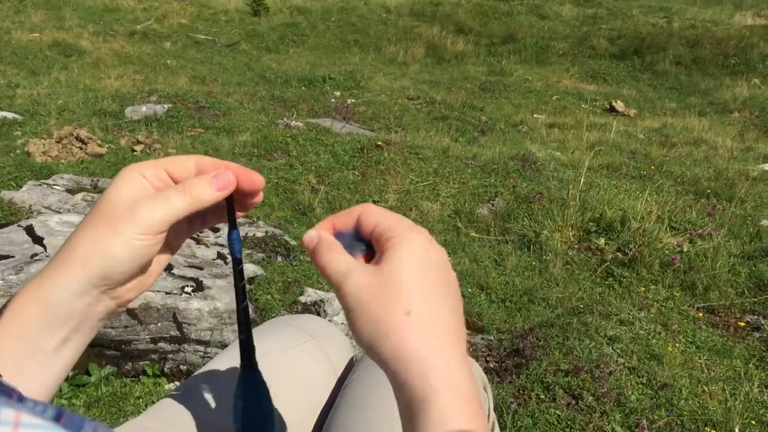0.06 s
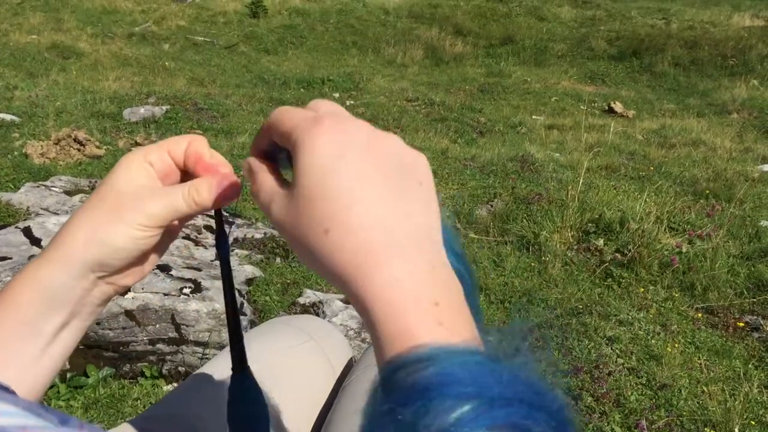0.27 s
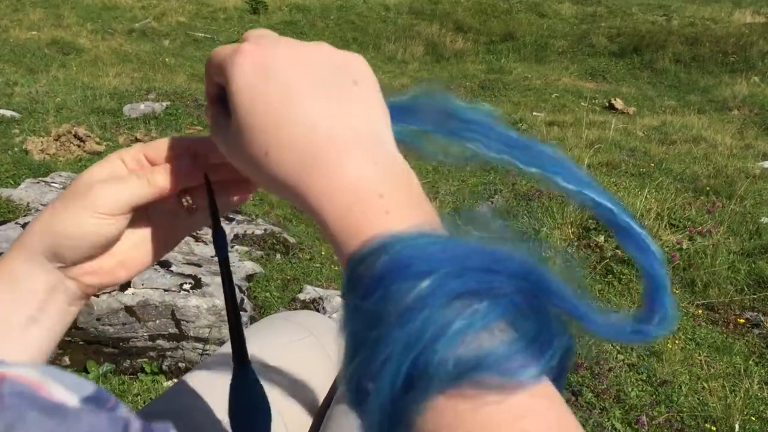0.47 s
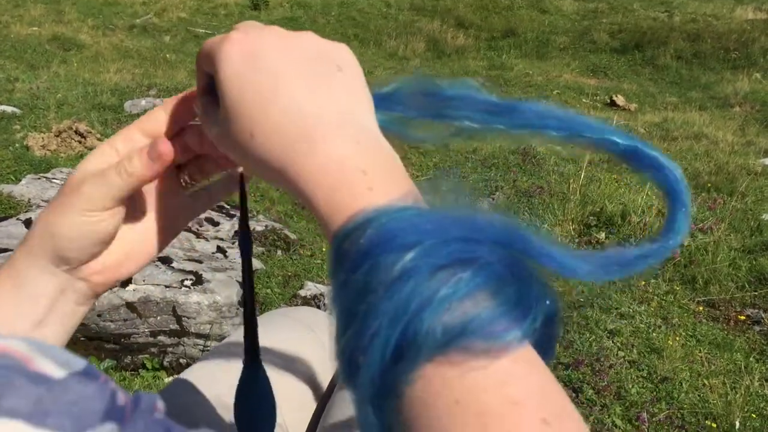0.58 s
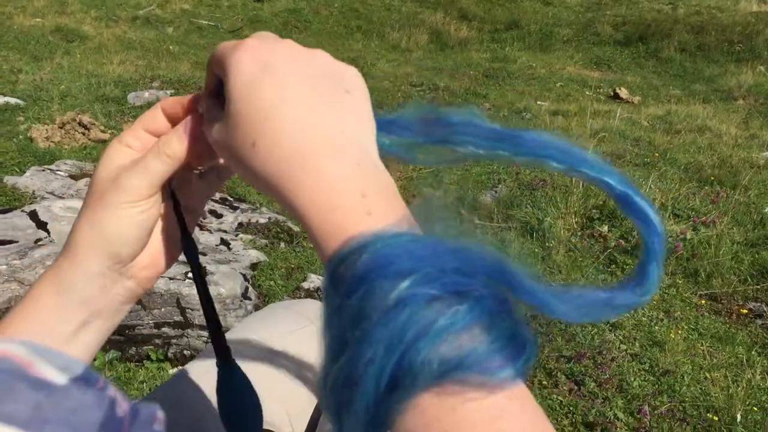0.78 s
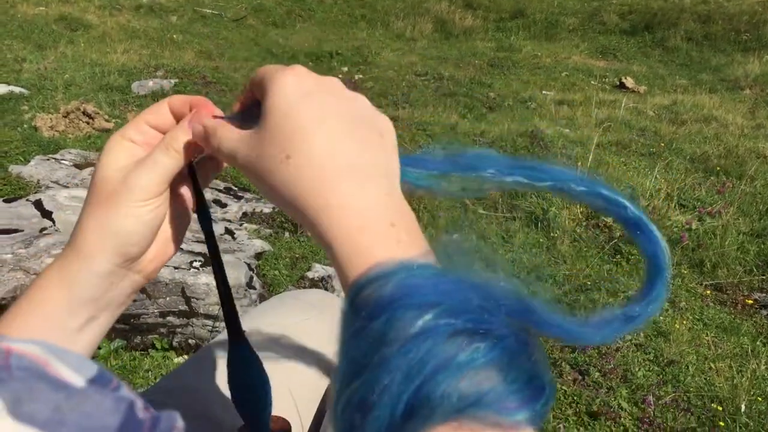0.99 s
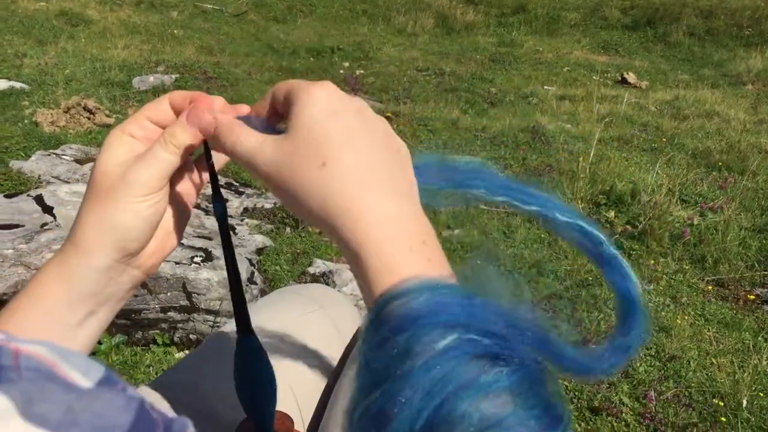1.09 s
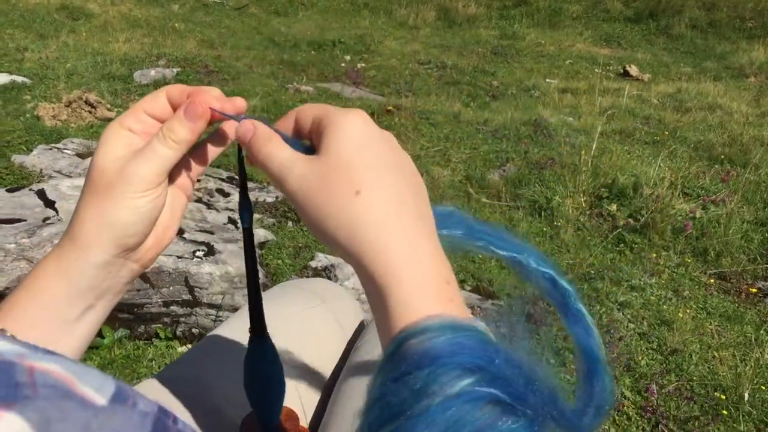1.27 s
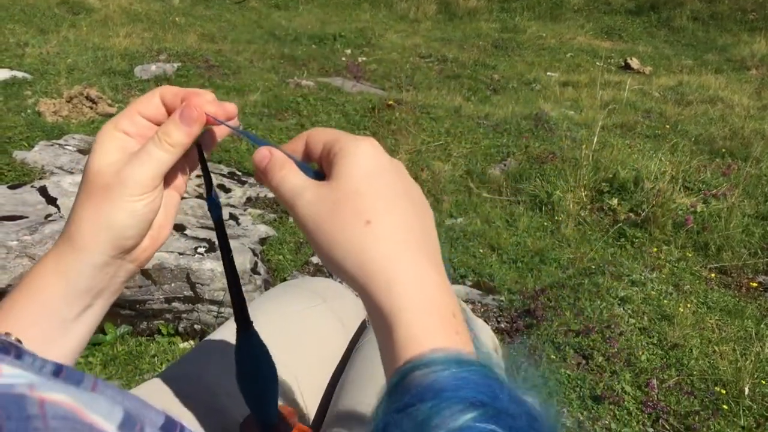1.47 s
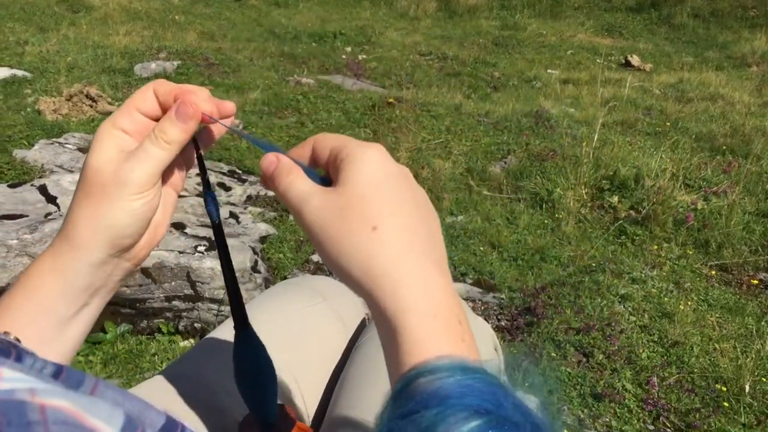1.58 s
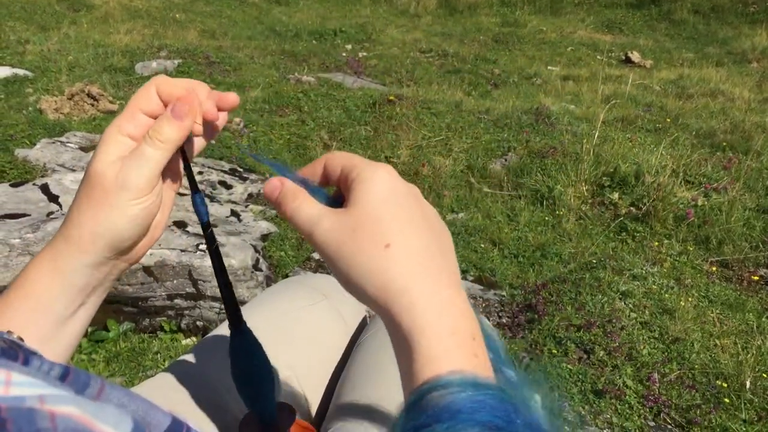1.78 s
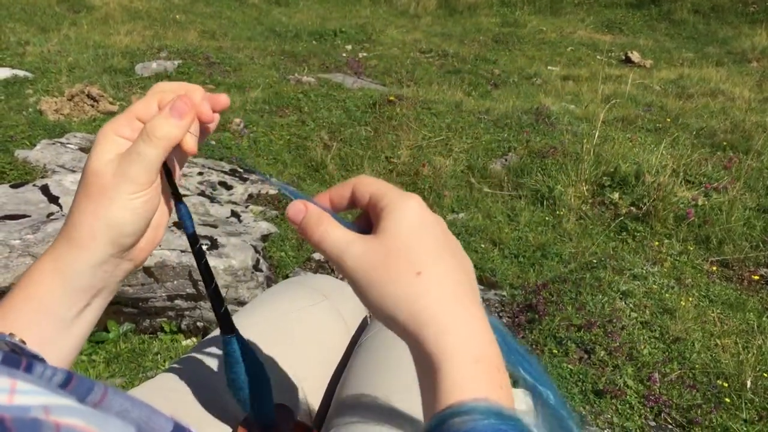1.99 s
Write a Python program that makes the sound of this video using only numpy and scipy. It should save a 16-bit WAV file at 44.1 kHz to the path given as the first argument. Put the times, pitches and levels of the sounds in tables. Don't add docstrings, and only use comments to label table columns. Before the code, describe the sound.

Light wind buffets a microphone in low uneven thumps, with one small wooden spindle knock

```python
import sys
import numpy as np
from scipy import signal
from scipy.fft import rfft, irfft
from scipy.io import wavfile

SR = 44100
rng = np.random.default_rng(int(sys.argv[2]) if len(sys.argv) > 2 else 0)


def digitize_waveform(pressure):
    field = np.atleast_2d(pressure).T
    bounded = np.clip(field, -1, 1)
    quanta = np.round(bounded * 32767).astype(np.int16)
    wavfile.write(sys.argv[1], SR, quanta)


def volts(x):
    e = np.asarray(x, float) / 20
    return 10 ** e


N = 90404

# centre_s [s], peak_db [dB], pitch_hz [Hz], length_s [s]
SLOW_EDDIES = [(0.01, -43.5, 88, 0.021), (0.067, -49.5, 77.5, 0.047), (0.169, -39, 80, 0.03),
               (0.361, -28.5, 79, 0.018), (0.442, -53.5, 66, 0.041), (0.527, -27, 63.8, 0.034),
               (0.706, -32.5, 75, 0.037), (0.78, -52.5, 68.4, 0.03), (0.877, -46, 72, 0.058),
               (0.928, -37, 75.7, 0.043), (0.972, -32.5, 62.8, 0.038), (1.059, -33, 75, 0.026),
               (1.163, -57.5, 65.5, 0.055), (1.206, -46, 54.3, 0.044), (1.277, -36.5, 83.6, 0.042),
               (1.492, -33, 87.5, 0.039), (1.619, -29.5, 68.4, 0.031), (1.808, -46, 88.5, 0.025),
               (1.862, -52.5, 86, 0.034), (1.941, -66, 60, 0.048), (2.023, -49.5, 86, 0.029)]
# centre_s [s], peak_db [dB], pitch_hz [Hz], length_s [s]
QUICK_EDDIES = [(0.1, -48.5, 96, 0.014), (0.211, -37.5, 151.3, 0.03), (0.273, -36, 111, 0.027),
                (0.617, -29.5, 142, 0.011), (0.658, -27, 125, 0.017), (0.773, -50.5, 174, 0.017),
                (0.834, -36.5, 105, 0.017), (0.933, -34.5, 183, 0.0118), (0.98, -34.5, 162, 0.015),
                (1.113, -36, 106, 0.026), (1.196, -46, 149, 0.025), (1.248, -32.5, 105, 0.013),
                (1.313, -44.5, 148, 0.023), (1.35, -37.5, 94.3, 0.04), (1.403, -34.5, 110.5, 0.025),
                (1.567, -22, 123.2, 0.019), (1.679, -31.5, 105.5, 0.016), (1.76, -21, 122, 0.0095),
                (1.928, -80, 264, 0.0092), (.39, -47, 100, .016), (1.756, -32, 65, .022),
                (.266, -46, 60, .022), (.616, -42, 70, .02), (1.745, -60, 400, .02)]
# centre_s [s], peak_db [dB], pitch_hz [Hz], length_s [s]
RIDING_EDDIES = [(.507, -39, 145, 0.013), (0.634, -37, 100, 0.022), (0.68, -43, 156, 0.034),
                 (.915, -34.5, 141, 0.014), (1.048, -40, 160, 0.0089), (1.255, -39, 191, 0.019),
                 (1.464, -34.5, 139, 0.021), (1.515, -39.5, 120, 0.031), (1.549, -28.5, 135, .015),
                 (1.725, -38.5, 206, 0.014), (1.741, -36, 150, 0.012), (1.748, -29, 80, 0.018),
                 (.355, -44.5, 159, 0.028), (.235, -48, 67, 0.019), (0.425, -53, 95, .025),
                 (0.598, -49, 66, 0.058), (1.0, -40.5, 103, 0.018), (1.569, -34.5, 52, 0.055),
                 (1.601, -51.5, 170, 0.015), (1.83, -48.5, 62, 0.044), (2.01, -55, 162, 0.016),
                 (1.49, -64, 317, 0.051), (.7, -40, 130, 0.0089), (1.556, -43, 262, 0.021),
                 (1.758, -47, 310, 0.014), (1.679, -47, 228, 0.017), (1.335, -49, 220, 0.019),
                 (.745, -48, 132, 0.023), (.548, -42, 143, .022), (1.795, -58, 140, 0.015),
                 (1.712, -37, 92, .02), (.726, -38, 160, .018), (.292, -47, 165, .016),
                 (1.13, -53, 175, .016), (.155, -58, 170, .016), (.2, -45, 75, .025),
                 (1.872, -68, 250, .02), (.72, -58, 270, .02), (1.645, -55, 70, .02)]
# time_s [s], level_db [dB]
GUST_STRENGTH = [(0, -64), (.19, -52), (.42, -56.5), (.53, -43), (.8, -56.5), (.95, -56.5), (1.13, -48),
                 (1.3, -53), (1.55, -45.5), (1.65, -59.5), (1.74, -42.5), (1.86, -65.5), (1.9, -81),
                 (2.05, -67)]
# pitch_hz [Hz], level_db [dB per Hz]
RUMBLE_COLOUR = [(15, -1), (25, -15), (42, 14), (59, 4.5), (140, 1), (247, -17), (328, -70), (420, -74.5),
                 (550, -59), (920, -120)]
# pitch_hz [Hz], level_db [dB per Hz]
HISS_COLOUR = [(180, -51), (300, 1.5), (759, -6.5), (1830, -8), (4860, -10.5), (6550, -9.5), (8970, -12.5),
               (10600, -12.5), (15800, -12.5)]
# start_s [s], peak_db [dB], contact_cut_hz [Hz], ring_share_db [dB], wood_pitch_ratio [ratio]
KNOCKS = [
    (.5775, -29, 3000, -19, 1.0),
    (.741, -60, 1200, -18, 1.1),
    (.831, -48, 750, -14, 1.1),
    (.837, -43, 950, -18, 1.05),
    (.8752, -45, 1150, -24, 1.03),
    (.882, -44, 650, -22, 1.03),
    (.606, -51, 1000, -8, 1.02),
    (.6, -53, 1800, -20, 1.0),
    (.92, -56, 900, -20, 1.0),
]
# pitch_hz [Hz], level_db [dB], t60_s [s]
CONTACT_MODES = [(498, -8, 0.019), (850, 0, .02), (1450, 1.5, 0.013), (2150, -4, 0.0065),
                 (3400, -16.5, 0.012), (5320, -8.5, 0.017)]
# pitch_hz [Hz], level_db [dB], t60_s [s]
WOOD_MODES = [(415, -2, .12), (856, -1, .3), (1010, -8, .06), (1312, 2, .2), (1650, -12, .05)]
# first_tick_s [s], period_s [s], level_db [dB], pitch_hz [Hz], width_hz [Hz]
GRASSHOPPERS = [
    (.0150, .05655, -68, 9300, 1800),
    (.0165, .0593, -69, 7600, 1800),
]
# time_s [s], first_db [dB], second_db [dB]
SINGING_EFFORT = [(0, 1, 0), (.15, 1, 0), (.3, -1, -2), (.45, -2, -2), (.6, -1, 0), (.75, -2, 1),
                  (.9, -2, 1), (1.05, -1, 1), (1.2, -2, -1), (1.35, -2, -3), (1.5, 1, 0), (1.65, 1, -1),
                  (1.8, 0, 0), (1.95, 0, 0), (2.05, 0, 1)]
# start_s [s], pitch_hz [Hz], level_db [dB], t60_s [s]
BELL_PARTIALS = [
    (.705, 2826, -74, 0.35),
    (.80, 4810, -75, 0.44),
    (.815, 4310, -72.5, 0.37),
    (.84, 1785, -76.5, 2.2),
    (1.41, 2830, -81, 0.31),
    (1.78, 1824, -85, 2),
]
# pitch_hz [Hz], width_hz [Hz], depth_db [dB]
PORT_DIPS = [(4950, 240, -2.5), (10650, 270, -4)]
# start_s [s], pitch_hz [Hz], peak_db [dB], rise_s [s]
PATS = [(.0, 550, -66, 0.0042), (0.832, 491, -64, 0.006), (0.841, 900, -60, 0.004), (.889, 880, -66, 0.005),
        (1.326, 540, -69, 0.0088), (1.635, 965, -62, 0.005), (1.635, 1417, -65, .004),
        (1.544, 368, -64, 0.013), (1.915, 550, -73, 0.01), (.831, 1350, -64, .004), (.915, 510, -70, .006),
        (1.924, 400, -73, .005), (1.984, 420, -75, .005), (2.034, 420, -73, .006), (.61, 415, -70, .008),
        (.829, 990, -64, .005), (.738, 890, -70, .004), (.607, 870, -62, .005), (.908, 910, -69, .005)]


def at_hz(points, hz):
    table_hz, table_db = np.array(points).T
    return np.interp(np.log(hz + 0.0009), np.log(table_hz), table_db)


def rms_one(x):
    return x / np.sqrt(np.mean(x ** 2) + 1e-20)


def coloured(spectrum, low_hz, high_hz):
    hz = np.fft.rfftfreq(N, 1 / SR)
    low_skirt = 1 / (1 + (low_hz / (hz + 1e-3)) ** 4)
    high_skirt = 1 / (1 + (hz / high_hz) ** 6)
    white = rfft(rng.standard_normal(N))
    return rms_one(irfft(white * volts(at_hz(spectrum, hz)) * low_skirt * high_skirt, N))


def drift(rate_hz):
    r = np.exp(-2 * np.pi * rate_hz / SR)
    return rms_one(signal.lfilter([1], [1, -2 * r, r * r], rng.standard_normal(N + SR))[SR:])


def ring(clicks, hz, t60):
    r = volts(-60 / (t60 * SR))
    w = 2 * np.pi * hz / SR
    return signal.lfilter([0, np.sin(w)], [1, -2 * r * np.cos(w), r * r], clicks + 1e-18)


def rumble():
    gust_s, gust_db = np.transpose(GUST_STRENGTH)
    lumps_db = 3.0 * drift(14.6)
    level_db = np.interp(np.arange(N) / SR, gust_s, gust_db) + lumps_db
    return volts(level_db) * coloured(RUMBLE_COLOUR, 32, 300)


def hiss():
    return volts(-70 + 0.89 * drift(37)) * coloured(HISS_COLOUR, 190, 21000)


def pats():
    t = np.arange(N) / SR
    total = np.zeros(N)
    for start, hz, db, rise in PATS:
        u = np.maximum(t - start, 0) / rise
        swell = u * np.exp(1 - u)
        total += volts(db) * swell * np.sin(2 * np.pi * hz * t)
    return (1 + 0.4 * drift(120)) * total


def eddies():
    width_share, gain_db, edge_db, pitch_slide = 0.3, 2, -33, 0.4
    out, t = np.zeros(N), np.arange(N) / SR
    band = signal.butter(4, [154, 276], "band", fs=SR, output="sos")
    fizz = volts(-30) * rms_one(signal.sosfilt(band, rng.standard_normal(N)))
    for table in (SLOW_EDDIES, QUICK_EDDIES, RIDING_EDDIES):
        for (start, db, hz, length), (turn, slide) in zip(table, rng.random((40, 2))):
            i = slice(max(int((start - .1) * SR), 0), int((start + .1) * SR))
            u = t[i] - start
            bend = 1 + (slide - .6) * pitch_slide * u / length
            phase = 2 * np.pi * (turn + hz * u * bend)
            shape = np.exp(-.5 * (u / (width_share * length)) ** 2)
            edge = volts(edge_db) * shape * np.cos(2 * phase + 9 * slide)
            out[i] += volts(db + gain_db) * shape * (np.cos(phase) + fizz[i] + edge)
    return out


def grasshoppers():
    tick_s, jitter_s, spread_db = 0.0018, 0.0009, 1.0
    out, t = np.zeros(N), np.arange(N) / SR
    effort_s, *efforts = np.transpose(SINGING_EFFORT)
    for (first, period, db, hz, width_hz), effort_db in zip(GRASSHOPPERS, efforts):
        effort = volts(np.interp(t, effort_s, effort_db))
        luck = np.clip(rng.standard_normal((40, 5)), -1.5, 1.5)
        times = first + period * np.arange(40) + jitter_s * luck[:, 0]
        bands = [(hz - width_hz, hz, 0), (hz, hz + width_hz, -1), (13000, 16000, -1.5)]
        for k, (low, high, part_db) in enumerate(bands):
            gate = np.zeros(N)
            for s, e in zip(times, luck):
                tick_db = spread_db * (e[1] + 0.69 * e[2 + k])
                gate += volts(tick_db) * np.exp(-.5 * ((t - s) / tick_s) ** 2)
            band = signal.butter(2, [low, high], "band", fs=SR, output="sos")
            noise = rms_one(signal.sosfilt(band, rng.standard_normal(N)))
            out += volts(db + part_db - 4) * effort * gate * noise
    return out


def spindle():
    chatter_s, chatter_per_s, chatter_db = .036, 700, -29
    grip_s, grip_fade_s, mode_luck_db = .036, .008, 1.5
    n = SR // 4
    t = np.arange(n) / SR
    out = np.zeros(N)
    for (start, db, cut_hz, ring_db, ratio), luck in zip(KNOCKS, rng.normal(0, mode_luck_db, (20, 14))):
        strike = np.zeros(n)
        strike[0] = -volts(db - 4.5)
        chance, height = rng.random((2, n))
        hits = (chance < chatter_per_s / SR) * (t < chatter_s)
        strike += volts(db + chatter_db) * hits * (2 * height - 1)
        strike = signal.lfilter(*signal.butter(2, cut_hz, fs=SR), strike)
        body = np.zeros(n)
        for k, (hz, mode_db, t60) in enumerate(CONTACT_MODES):
            body += (-1) ** k * volts(mode_db + luck[k]) * ring(strike, hz, t60)
        for (hz, mode_db, t60), luck_db in zip(WOOD_MODES, luck[7:]):
            body += volts(mode_db + ring_db + luck_db) * ring(strike, hz * ratio, t60)
        held_s = grip_s * (1.3 if db > -35 else .7)
        body /= 1 + np.exp(np.minimum((t - held_s) / grip_fade_s, 50))
        i = int(start * SR)
        out[i:i + n] += body[:N - i]
    return out


def bells():
    t = np.arange(N) / SR
    out = np.zeros(N)
    for start, hz, db, t60 in BELL_PARTIALS:
        decay = volts(db - 60 * np.maximum(t - start, 0) / t60)
        attack = np.clip((t - start) / .008, 0, 1)
        out += decay * attack * np.sin(2 * np.pi * hz * t)
    return out


def scene():
    mix = rumble() + hiss() + pats() + eddies() + grasshoppers() + spindle() + bells()
    return mix[None]


def top_cut(x):
    return signal.sosfilt(signal.butter(12, 15910, fs=SR, output="sos"), x)


def record(dry):
    low_cut_hz, top_cut_hz = 34, 15830
    hz = np.fft.rfftfreq(N, 1 / SR)
    dips_db = sum(db * np.exp(-.5 * ((hz - dip_hz) / width_hz) ** 2) for dip_hz, width_hz, db in PORT_DIPS)
    response = volts(dips_db) * (hz < top_cut_hz)
    cut = signal.sosfilt(signal.butter(3, low_cut_hz, "high", fs=SR, output="sos"), dry)
    return top_cut(irfft(rfft(cut) * response, N))


dry = scene()
out = record(dry)
digitize_waveform(out)
```